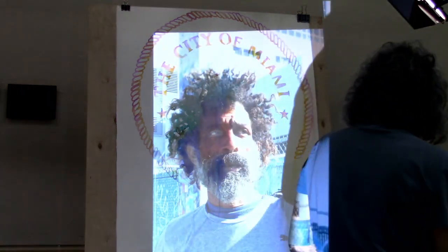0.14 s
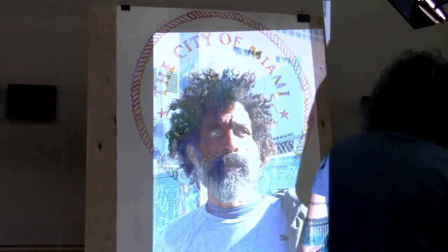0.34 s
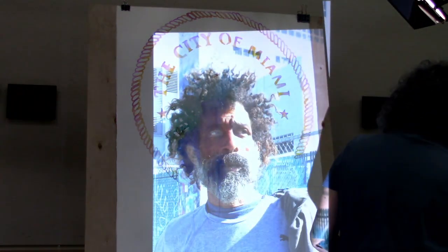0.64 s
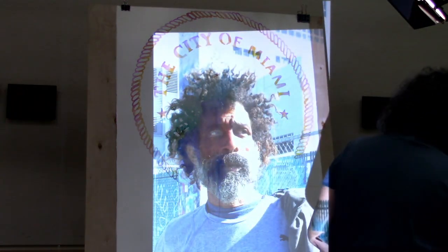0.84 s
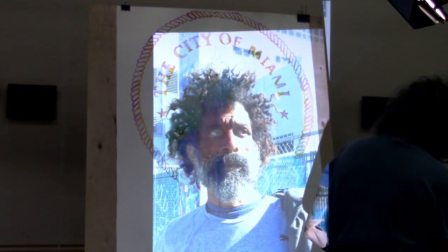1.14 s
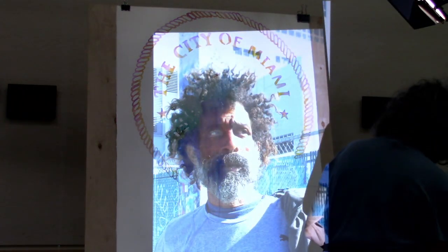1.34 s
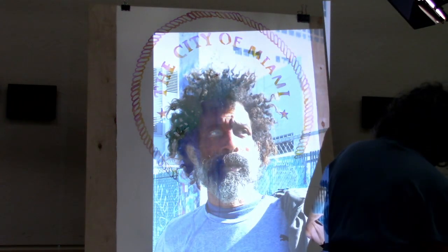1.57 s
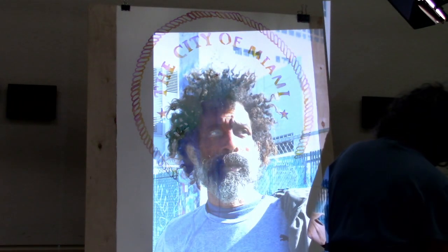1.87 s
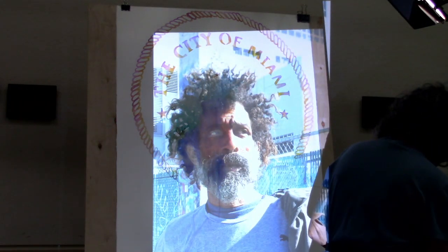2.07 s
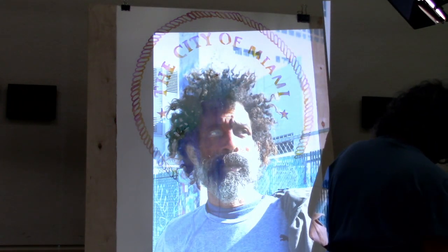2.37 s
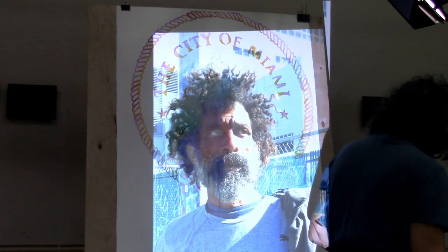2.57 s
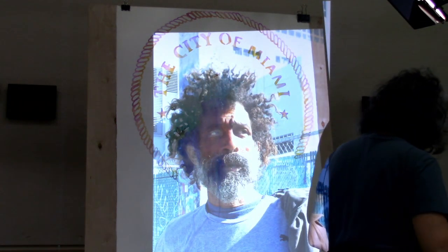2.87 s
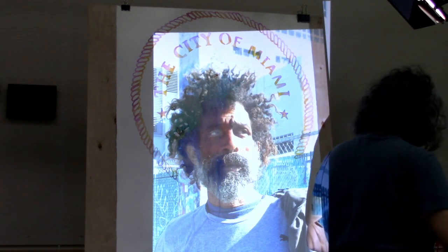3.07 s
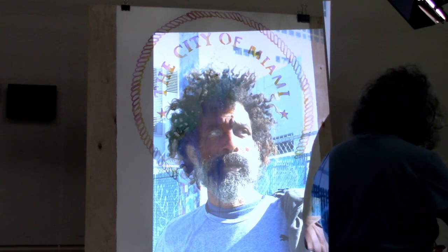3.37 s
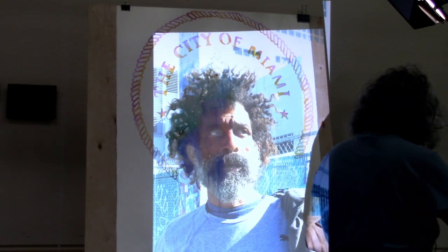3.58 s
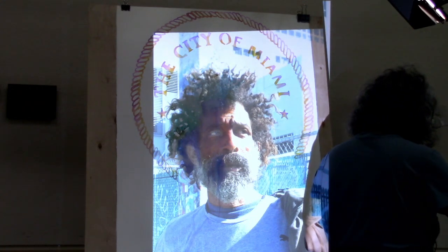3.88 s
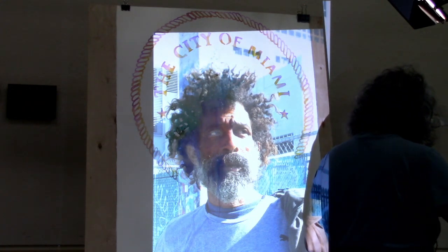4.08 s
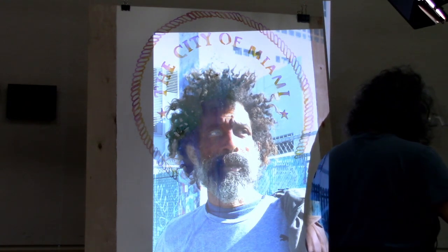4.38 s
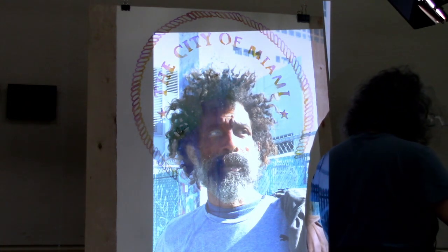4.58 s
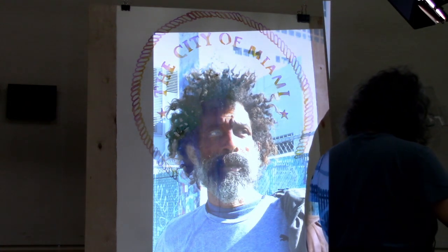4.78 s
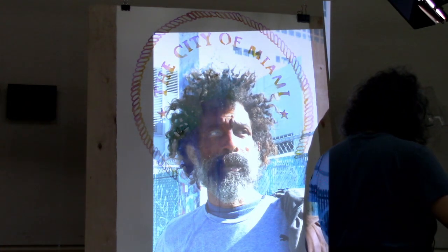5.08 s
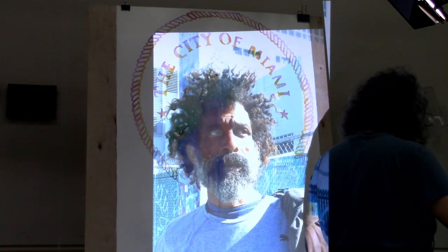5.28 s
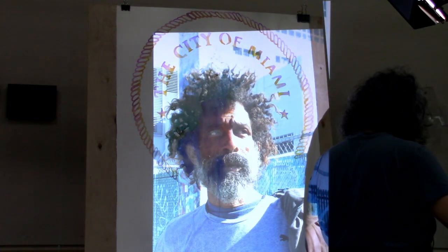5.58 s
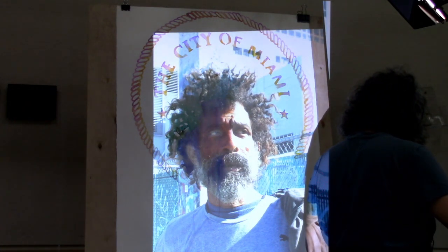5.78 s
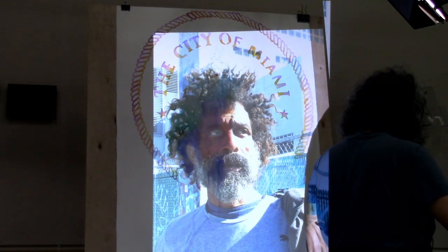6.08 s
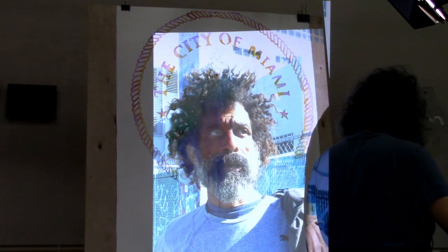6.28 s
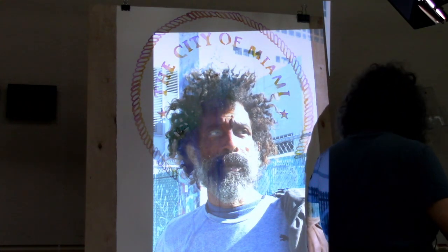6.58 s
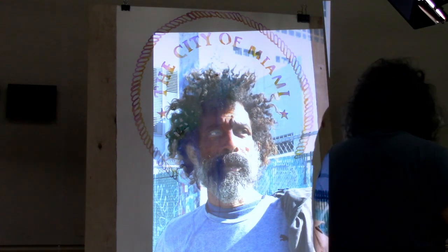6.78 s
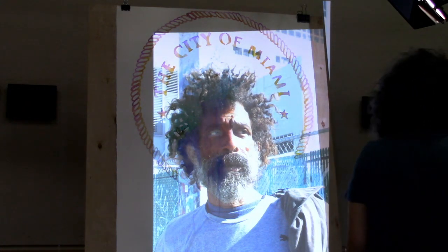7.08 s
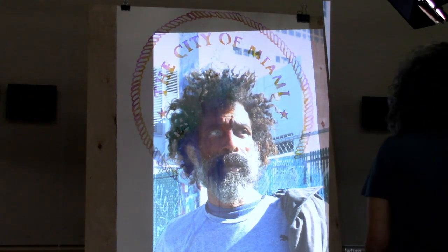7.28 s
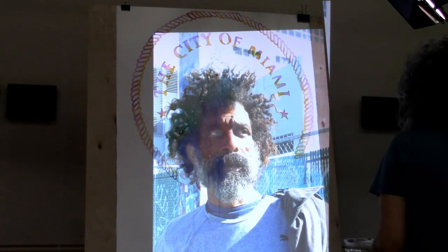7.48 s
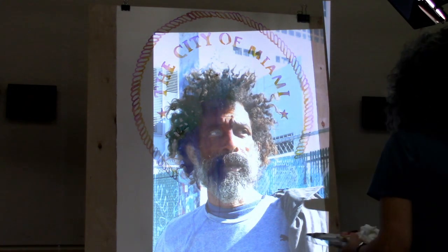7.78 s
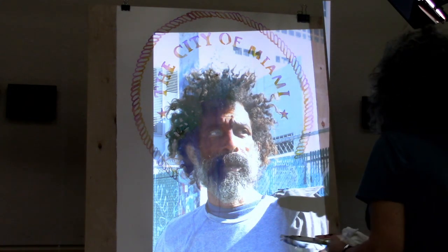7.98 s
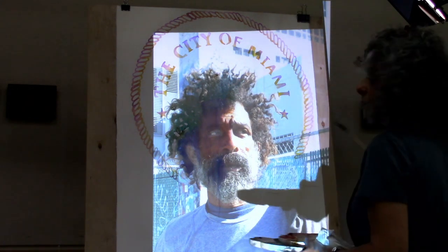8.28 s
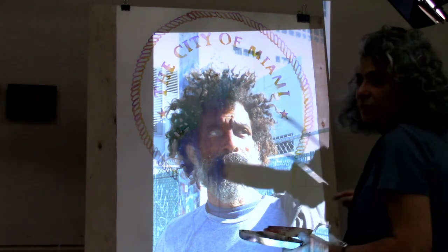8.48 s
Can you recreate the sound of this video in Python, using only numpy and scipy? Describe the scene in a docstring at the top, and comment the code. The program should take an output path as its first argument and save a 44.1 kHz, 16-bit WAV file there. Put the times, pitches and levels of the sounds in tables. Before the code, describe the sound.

Steady muffled buzz of mains and small fans, fluttering slightly, broken by one short sharp rattle and later a couple of soft taps.

```python
"""Electrical hum fills a quiet room heard through a cheap digital microphone: steady tones over low noise.
Mains buzz and three small motors leak in, each mixed with the data clock to give mirrored tones.
The top edge of the hum wanders and its level flutters in patches.
Something light clatters once nearby, made of short noise bursts; a few faint ticks follow."""
import sys
import numpy as np
from scipy import signal
from scipy.fft import rfft, irfft
from scipy.io import wavfile
from scipy.ndimage import uniform_filter1d

SR = 44100
rng = np.random.default_rng(int(sys.argv[2]) if len(sys.argv) > 2 else 0)


def materialize(psi):
    """Save the field psi as 16-bit PCM at rate SR to the path in sys.argv[1].

    A 1-D psi becomes a single channel; in a 2-D psi each row is a channel.
    """
    bounded = np.clip(np.atleast_2d(psi).T, -1, 1)
    quanta = np.round(bounded * 32767).astype(np.int16)
    wavfile.write(sys.argv[1], SR, quanta)


N = 380874
T = np.arange(N) / SR  # time in seconds
CLOCK_HZ, MAINS_HZ = 187.5, 60.0


def gain_of(db):
    """Turns decibels into a plain multiplier."""
    return 10 ** (np.asarray(db) / 20)


def read(points, hz):
    """Reads a drawn spectrum, with straight lines between points on a log-frequency axis."""
    point_hz, value = np.transpose(points)
    return np.interp(np.log(hz + 1), np.log(point_hz + 1), value)


def follow(points, t):
    """Reads a drawn curve over time, with straight lines between points."""
    return np.interp(t, *np.transpose(points))


def noise(points):
    """Steady random noise with the given level per Hz."""
    white = rfft(rng.standard_normal(N)) * np.sqrt(SR / 2)
    level_db = read(points, np.fft.rfftfreq(N, 1 / SR))
    return irfft(white * gain_of(level_db), N)


def colour(x, db):
    """Filters x by a level for each frequency bin; white noise keeps its power."""
    gain = gain_of(db)
    gain = gain / np.sqrt(np.mean(gain ** 2))
    return irfft(rfft(x) * gain, len(x))


def burst(t, start_s, db, rise_s, t60_s):
    """Loudness curve of one blow: a soft quick rise, then a fall of 60 dB in t60_s."""
    age = np.maximum(t - start_s, 0)
    rise = np.sin(np.pi / 2 * np.minimum(age / rise_s, 1)) ** 2
    return gain_of(db - 60 * age / t60_s) * rise


def tones(table, turns, scatter):
    """Sine tones at multiples of a source mixed with multiples of the clock."""
    starts = scatter * rng.random(len(table))  # starting points, in turns
    total = np.zeros(N)
    for (source_multiple, clock_multiple, db), start in zip(table, starts):
        phase = source_multiple * turns + clock_multiple * CLOCK_HZ * T + start
        total += np.sqrt(2) * gain_of(db) * np.cos(2 * np.pi * phase)
    return total


# speed of the throbbing motor, which sags once: start_s, speed_hz
MOTOR_SPEED = [(0, 91.443), (1.5, 91.514), (3, 91.515), (4.8, 91.476), (5.25, 91.09), (6.9, 91.025),
               (8.64, 91.055)]
# its tones: source_multiple, clock_multiple, level_db (rms, before the slight rise)
MOTOR_TONES = [(1, 0, -58), (-1, 1, -61), (1, 1, -66), (-1, 2, -59), (1, 2, -71), (-1, 3, -68), (3, 0, -80)]


def throbbing_motor():
    """A motor tone and its mirror from the clock lie about 5 Hz apart, so they throb."""
    first_throb_s = .018
    turns = np.cumsum(follow(MOTOR_SPEED, T)) / SR
    turns += first_throb_s * (CLOCK_HZ / 2 - MOTOR_SPEED[0][1])  # lines the pair up at that moment
    rise_db = np.interp(T, [4.6, 5.3], [-.3, .4])  # a very slight rise in level around the sag
    return gain_of(rise_db) * tones(MOTOR_TONES, turns, 0)


# slow sway, a little under twice a second: time_s, sways_counted
SWAYS = [(-.07, -1), (4.3, 6), (5.95, 9), (8.05, 12), (8.64, 13)]


def sway():
    """A slow wave between -1 and 1, shared by one mains tone and the edge of the hum."""
    return np.cos(2 * np.pi * follow(SWAYS, T))


# mains tones: mains_multiple, clock_multiple, level_db (rms, before the trim)
MAINS_TONES = [(1, 0, -76), (3, 0, -71), (5, 0, -78), (6, 0, -81), (7, 0, -62), (9, 0, -58), (10, 0, -80),
               (11, 0, -68), (12, 0, -76), (13, 0, -63), (15, 0, -66), (17, 0, -68), (21, 0, -81),
               (-3, 1, -85), (-1, 1, -75), (-3, 2, -78), (-1, 2, -75), (-3, 3, -75), (-7, 4, -75),
               (-9, 5, -75), (-7, 5, -74), (-9, 6, -73), (4, 5, -88), (8, 4, -90), (6, 5, -87), (4, 6, -92)]


def mains_buzz(swaying):
    """Multiples of the mains, some mirrored around the clock; one more swells with the sway."""
    trim_db = -0.39
    steady = gain_of(trim_db) * tones(MAINS_TONES, MAINS_HZ * T, 0.93)
    swelling = tones([(19, 0, -72.5)], MAINS_HZ * T, 1)
    return steady + (1 + .45 * swaying) * swelling


# tones of the two fans: source_multiple, clock_multiple, level_db (rms, before the trim)
FAN_TONES = [(1, 0, -85), (-1, 1, -84), (4, -1, -83), (-4, 2, -73), (4, 0, -64), (-4, 3, -68), (-4, 4, -77),
             (7, 0, -72), (14, 0, -78), (20, 0, -83)]
SLOW_FAN_TONES = [(1, 0, -75), (-1, 1, -74), (1, 1, -80), (-1, 2, -75), (1, 2, -81), (3, 0, -79),
                  (-3, 1, -89), (8, 0, -71), (12, 0, -78)]


def fans():
    """Two small fan motors, each at a steady speed that later drops a little."""
    trim_db = -1.0
    fan_hz = np.interp(T, [6.6, 7.9], [53.82, 53.49])
    slow_fan_hz = np.interp(T, [6.6, 7.2], [50.66, 50.43])
    fan = tones(FAN_TONES, np.cumsum(fan_hz) / SR, 0.68)
    slow_fan = tones(SLOW_FAN_TONES, np.cumsum(slow_fan_hz) / SR, 0.16)
    return gain_of(trim_db) * (fan + slow_fan)


# thin steady tones: pitch_hz, level_db (rms)
WHINES = [(1000, -78), (1128.92, -78)]


def whines():
    """Plain sine tones that belong to neither the mains nor the motors."""
    return tones([(hz, 0, db) for hz, db in WHINES], T, 0.9)


# where the top of the hum rolls off, before sway and flicker: time_s, corner_hz
EDGE = [(0, 1055), (.55, 1147), (.9, 1003), (1.3, 1107), (1.85, 1156), (2.04, 1260), (2.1, 940),
        (2.85, 970), (3.1, 1088), (4.0, 1064), (4.8, 1115), (5.9, 1117), (6.3, 1033), (6.6, 1206),
        (7.1, 1152), (8.64, 1140)]


def wander(x, swaying):
    """Slides the treble roll-off up and down and makes the level flutter in patches."""
    usual_corner_hz, sway_hz, flicker_hz = 1144.4, 54.92, 30
    hz, t, z = signal.stft(x, SR, nperseg=1024, noverlap=768)
    flicker = uniform_filter1d(rng.standard_normal(len(t)), size=8) * np.sqrt(8)
    corner_hz = follow(EDGE, t) + flicker_hz * flicker
    corner_hz += sway_hz * np.interp(t, T, swaying)

    def loss_db(corner):
        """Loss that grows smoothly above the corner, to 45 dB at most."""
        return np.minimum(11 * np.logaddexp(0, (hz[:, None] - corner) / 120), 45)

    # smooth random numbers over pitch, then time; the 6 restores their spread
    patches = uniform_filter1d(rng.standard_normal(z.shape), size=4, axis=0)
    patches = uniform_filter1d(patches, size=9, axis=1) * 6
    depth_db = read([(120, .1), (300, 0.56), (700, 0.71), (1200, 2.3)], hz)  # (Hz, dB)
    flutter_db = patches * depth_db[:, None]
    z = z * gain_of(loss_db(usual_corner_hz) - loss_db(corner_hz) + flutter_db)
    return signal.istft(z, SR, nperseg=1024, noverlap=768)[1][:N]


# low noise under the tones, before the edge wanders: pitch_hz, level_db_per_hz
RUMBLE = [(10, -105), (50, -100), (100, -99), (150, -91), (400, -88.5), (600, -88.5), (900, -91.5),
          (1100, -94), (1250, -104), (1400, -113), (1600, -125), (2000, -145)]


def hum():
    """All the steady tones and the low noise, wandering together."""
    swaying = sway()
    steady_tones = throbbing_motor() + mains_buzz(swaying) + fans() + whines()
    return wander(steady_tones + noise(RUMBLE), swaying)


# the main blows: start_s, rattle_db, thud_db, sizzle_db (before the fall and the room)
CLATTER = [(1.8625, -31.5, -24.5, -48.5), (1.8746, -30.5, -21.5, -49.5), (1.881, -22, -30.5, -45.5),
           (1.8854, -14, -24.5, -20), (1.8897, -23, -20, -36.5), (1.917, -27.5, -36, -50),
           (1.931, -28, -33, -42), (1.9497, -18.5, -29, -45.5), (1.973, -26.5, -24, -46.5),
           (1.9975, -33.5, -35, -61), (2.049, -60, -39, -83)]
# tone colour of each register, only its shape counts: pitch_hz, relative_db
RATTLE = [(700, -42), (1200, -11.5), (1750, -3.5), (2300, -7), (3000, -10), (3800, -6), (4500, -1),
          (5000, -3.5), (5700, -11.5), (6700, -19), (9000, -40.5), (13000, -90)]
THUD = [(60, -36.5), (130, -18), (250, -14), (420, 0.5), (520, -1), (590, 2), (680, -2.5), (800, -1.5),
        (1100, -9.5), (1400, -10.5), (2000, -24), (3200, -45), (9000, -89.5)]
SIZZLE = [(4000, -29), (6300, -11.5), (7200, -4.5), (8200, 1.5), (9200, -8), (10400, -11), (12000, -25),
          (13500, -52.5), (16000, -80.5)]


def clatter():
    """Noisy blows in three registers; a short room tail joins them, the treble dying first."""
    # between the main blows it chatters at random, uneven in level, a little softer on the whole
    chatter_s, fade_db_per_s, spread_db = .125, 25.5, 4.5
    first_db = np.array([-33, -34.5, -50.5])[:, None]  # rattle, thud, sizzle
    when, size = rng.random((14, 2)).T
    age = chatter_s * (np.arange(len(when)) + when) / len(when)
    small_db = first_db - fade_db_per_s * age + spread_db * (2 * size - 1)
    small_blows = np.vstack([CLATTER[0][0] + age, small_db])
    starts, *levels = np.hstack([np.transpose(CLATTER), small_blows])

    near = slice(int(1.7 * SR), int(2.4 * SR))  # the stretch that holds the clatter
    t, out = T[near], np.zeros(N)
    hz = np.fft.rfftfreq(len(t), 1 / SR)
    # spectrum, blow t60 in s, room level in dB, room t60 in s, cut in s
    registers = [(RATTLE, .026, -16, .25, 2.05),
                 (THUD, .035, -16.5, .36, 2.1),
                 (SIZZLE, .016, -16, .13, 2.03)]
    for (spectrum, blow_t60, room_db, room_t60, cut_s), dbs in zip(registers, levels):
        blows = list(zip(starts, dbs))
        direct = sum(burst(t, s, db, 0.0008, blow_t60) ** 2 for s, db in blows)
        room = sum(burst(t, s, db + room_db, 0.005, room_t60) ** 2 for s, db in blows)
        fade = gain_of(-450 * np.maximum(t - cut_s, 0))  # the tail is cut short
        rough = np.sqrt(direct + room) * fade * rng.standard_normal(len(t))
        out[near] += colour(rough, read(spectrum, hz))
    return out


# faint ticks, a dull knock with a brighter click on it:
# start_s, knock_db, knock_t60_s, click_db, click_hz, click_width_hz
TICKS = [(3.105, -90, .1, -82, 5100, 400), (3.335, -62.5, 0.18, -76, 2300, 1200),
         (3.357, -52.5, 0.086, -67.5, 2290, 1000), (3.39, -61.5, .14, -80, 2100, 800),
         (3.583, -61, 0.13, -67.5, 3700, 1100), (3.602, -47.5, 0.061, -66, 3000, 2000),
         (3.634, -59, 0.29, -65, 4020, 900), (6.491, -64.5, .17, -90, 2000, 600)]


def ticks():
    """Small noisy taps, each made of two bands of noise with steep sides."""
    knock_hz, knock_width_hz, click_t60 = 1350, 540, 0.063
    out, t = np.zeros(N), T[:SR // 2]
    hz = np.fft.rfftfreq(len(t), 1 / SR)
    for start_s, knock_db, knock_t60, click_db, click_hz, click_width in TICKS:
        bands = [(knock_db, knock_hz, knock_width_hz, knock_t60),
                 (click_db, click_hz, click_width, click_t60)]
        first = round((start_s - .05) * SR)  # leaves a little room ahead of the tap
        for db, centre_hz, width_hz, t60 in bands:
            band_db = np.maximum(-4.5 * (2 * (hz - centre_hz) / width_hz) ** 2, -80)
            rough = burst(t, 0.0502, db, 0.0028, t60) * rng.standard_normal(len(t))
            out[first:][:len(t)] += colour(rough, band_db)
    return out


def scene():
    """Everything that reaches the converter."""
    return (hum() + clatter() + ticks())[None]


def gain_control(dry):
    """Turns the sound above the bass down after loud moments, then lets go at a steady rate."""
    release_db_per_s, threshold_db = 60., -40.5
    power_db = 10 * np.log10(abs(uniform_filter1d(dry[0] ** 2, size=400)) + 1e-12)
    fall_db = T * release_db_per_s
    held_db = np.maximum.accumulate(power_db + fall_db) - fall_db
    over_db = np.clip(held_db - threshold_db, 0, 8)
    dip_db = .5 * uniform_filter1d(over_db, size=400)
    low_pass = signal.butter(2, 300, fs=SR, output="sos")
    bass = signal.sosfiltfilt(low_pass, dry)  # the bass passes untouched
    return bass + (dry - bass) / gain_of(dip_db)


# converter hiss, before it creeps up: pitch_hz, level_db_per_hz
HISS = [(20, -118), (1500, -117), (2500, -121), (4000, -125), (10000, -132), (16000, -134)]


def record(dry):
    """Gain control, then converter hiss that slowly creeps up, then a limit on the treble."""
    hiss = noise(HISS) * gain_of(0.12 * (T + 1.0))
    wired = gain_control(dry) + hiss
    band_limit = signal.firwin(511, 15750, window=("kaiser", 9), fs=SR)  # cutoff in Hz
    return signal.oaconvolve(wired, band_limit[None], "same")


dry = scene()
out = record(dry)
materialize(out)
```